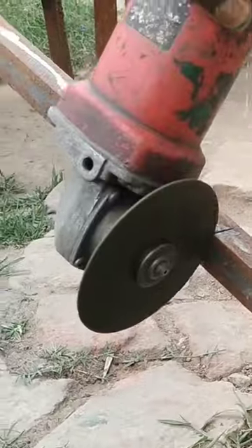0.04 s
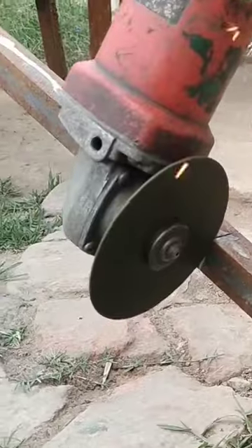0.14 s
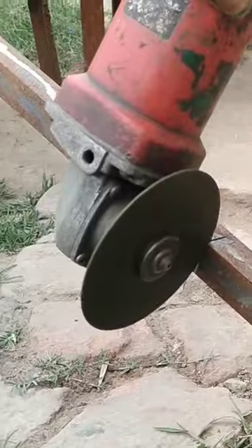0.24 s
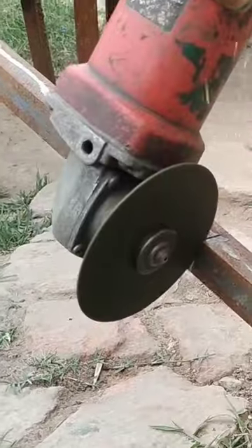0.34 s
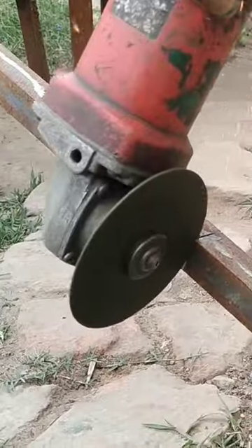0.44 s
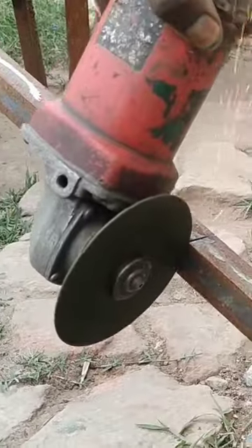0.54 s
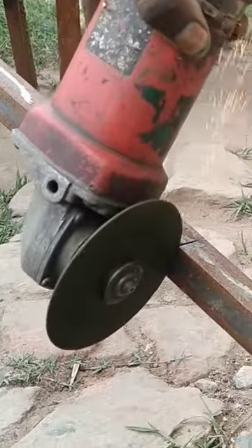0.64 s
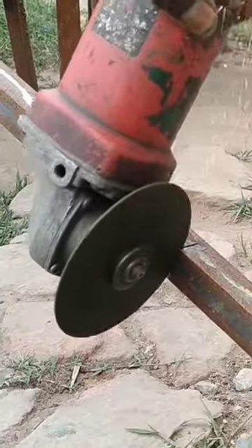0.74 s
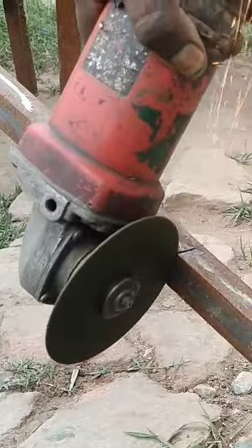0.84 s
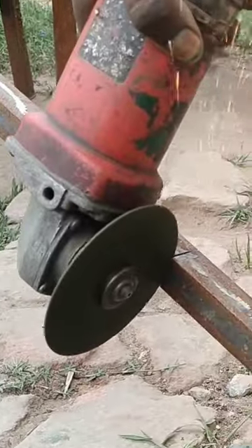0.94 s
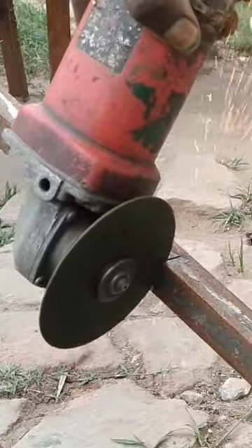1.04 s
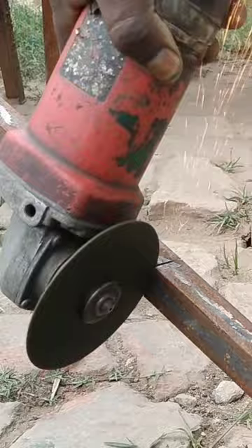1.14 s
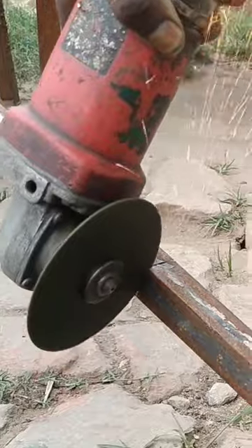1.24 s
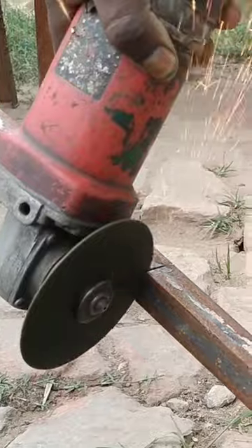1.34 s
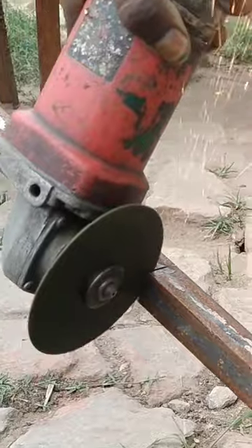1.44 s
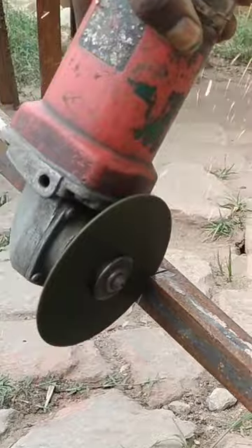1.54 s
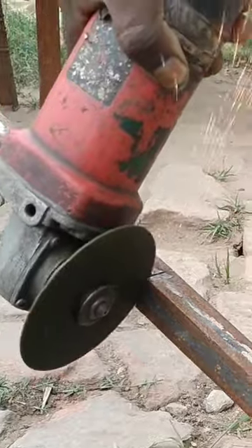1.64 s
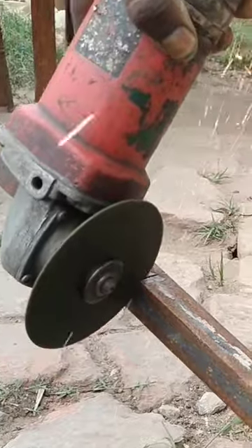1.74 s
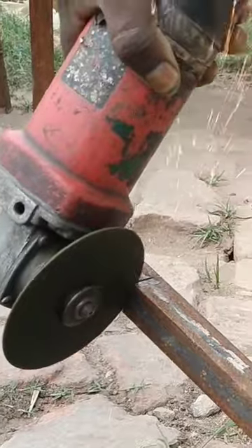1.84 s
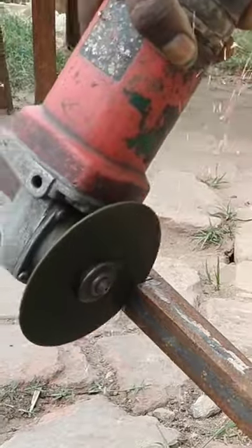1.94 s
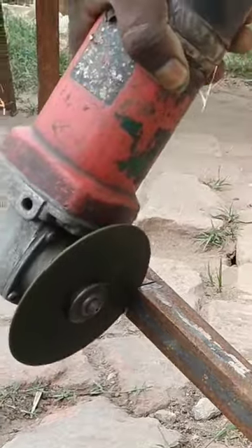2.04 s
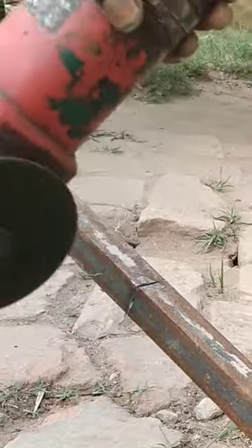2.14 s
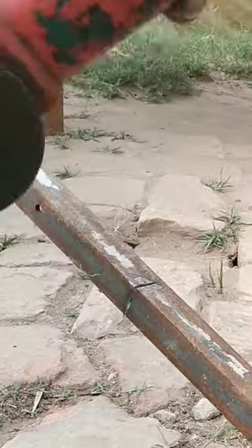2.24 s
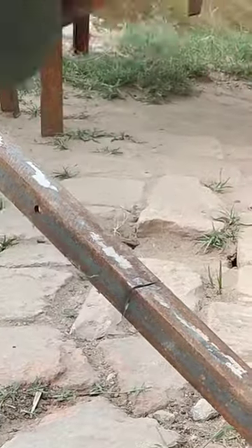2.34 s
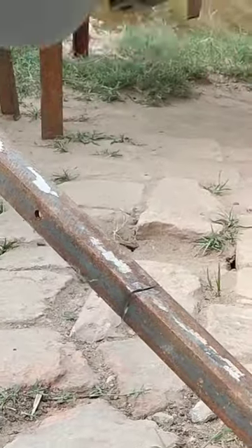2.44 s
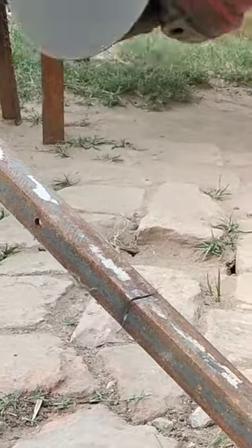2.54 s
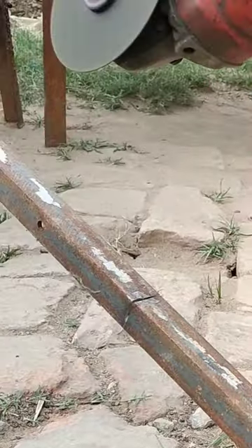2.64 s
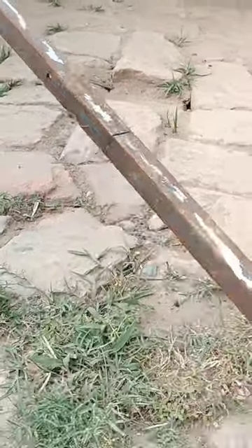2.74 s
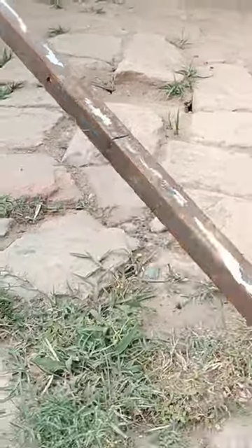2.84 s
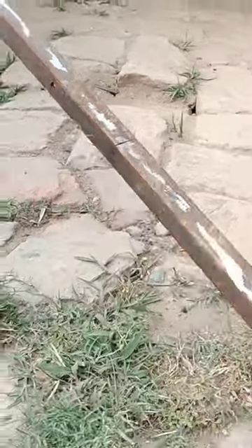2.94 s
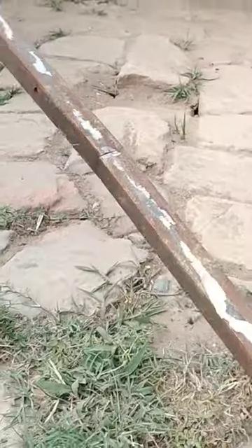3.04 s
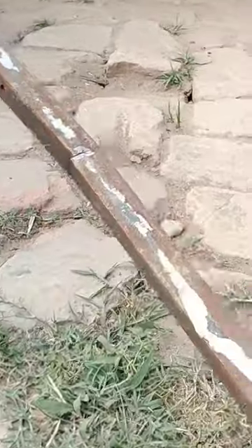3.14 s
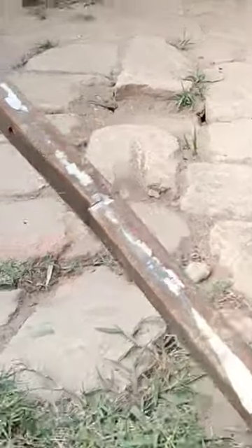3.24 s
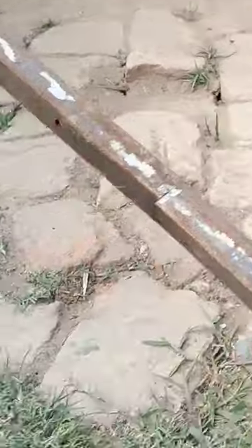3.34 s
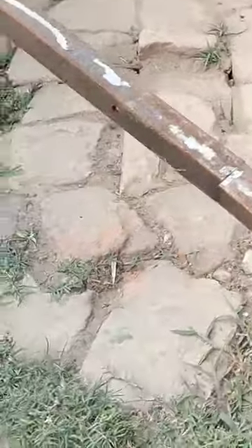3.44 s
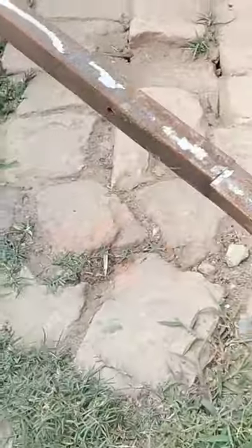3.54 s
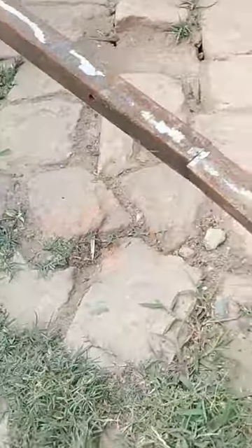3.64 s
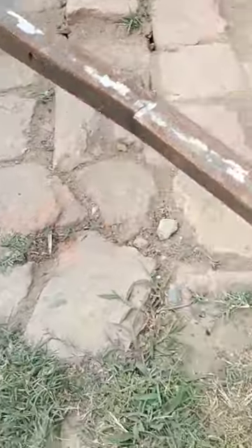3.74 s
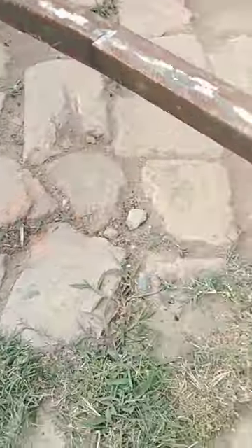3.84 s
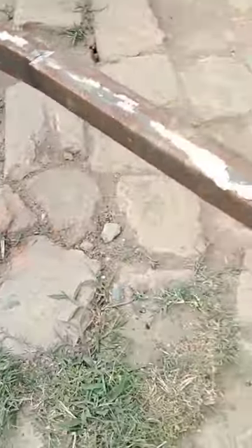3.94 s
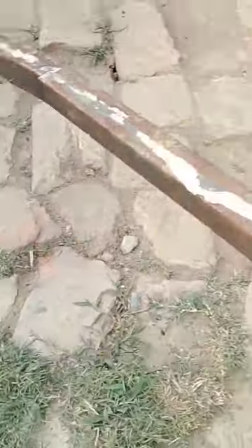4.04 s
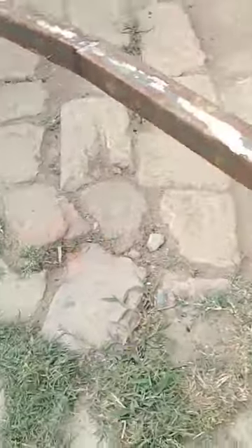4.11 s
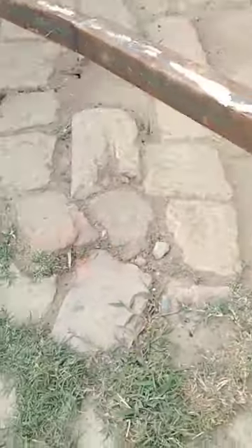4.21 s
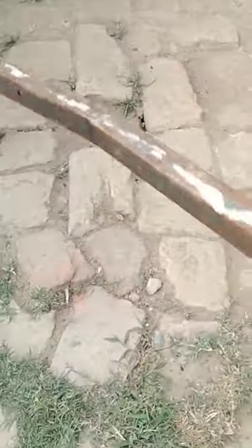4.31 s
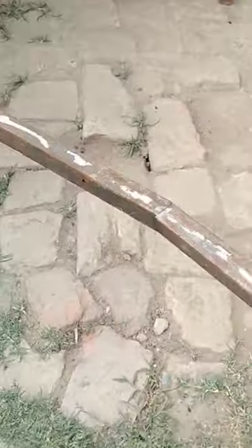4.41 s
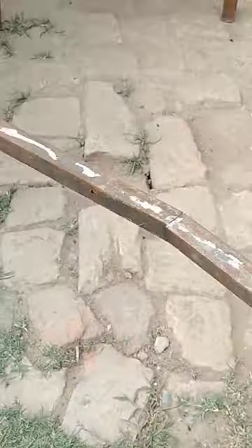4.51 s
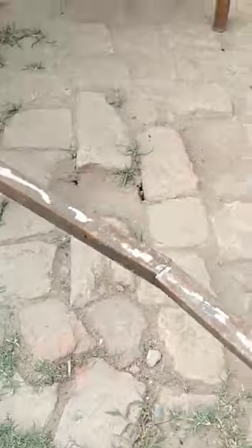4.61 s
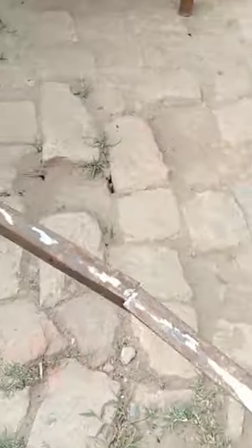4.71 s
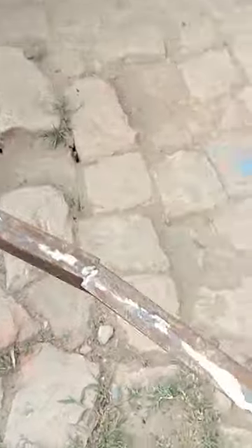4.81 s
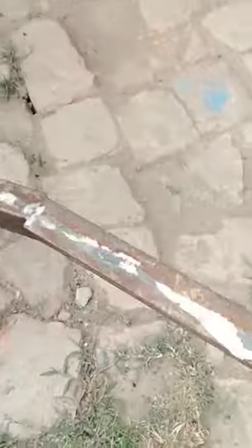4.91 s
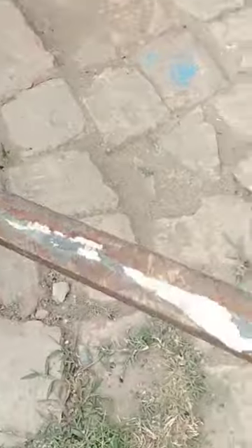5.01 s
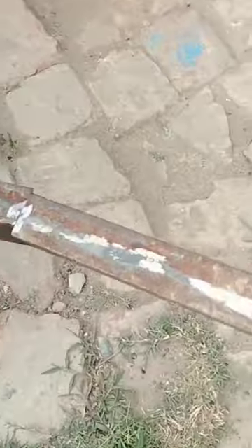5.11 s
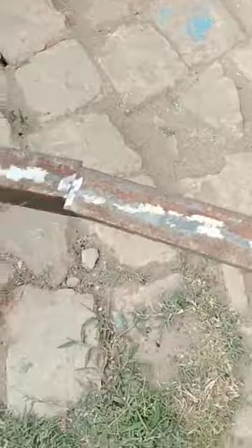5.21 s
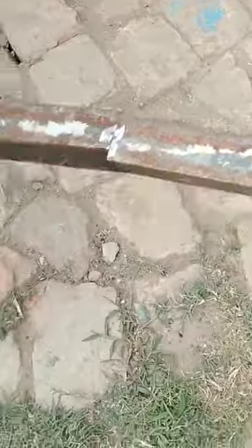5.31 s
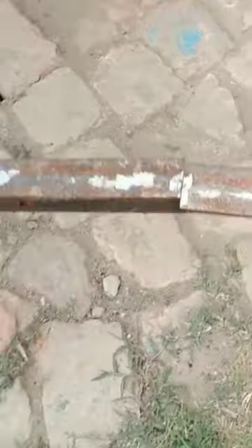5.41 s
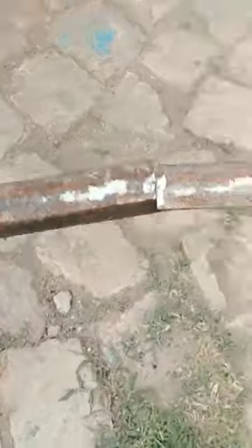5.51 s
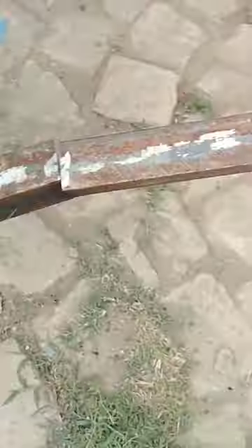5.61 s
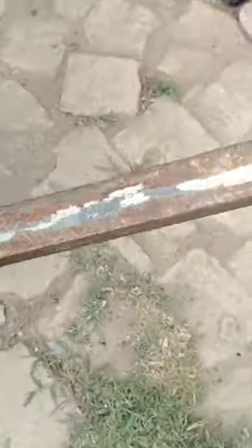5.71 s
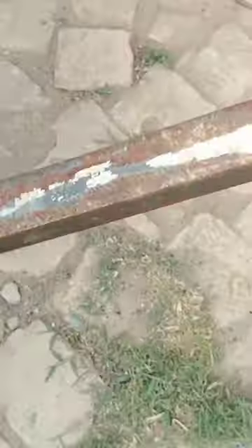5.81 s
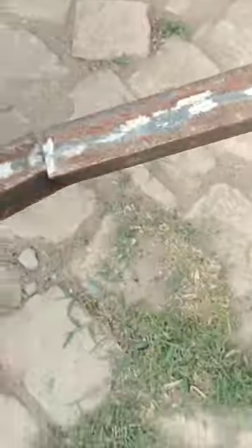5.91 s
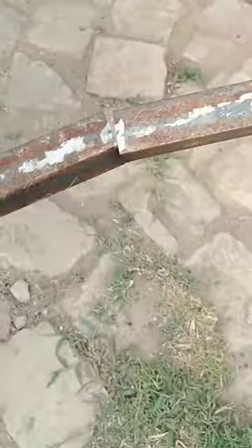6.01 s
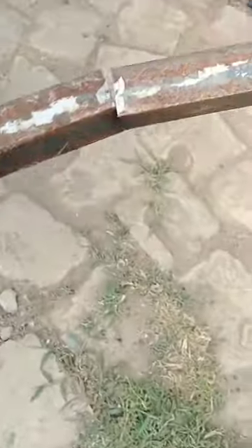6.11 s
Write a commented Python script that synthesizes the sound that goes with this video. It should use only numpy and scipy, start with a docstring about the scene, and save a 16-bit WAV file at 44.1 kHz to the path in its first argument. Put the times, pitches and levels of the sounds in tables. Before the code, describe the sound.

An angle grinder is already tearing through steel, gritty and whining, with puffs of air hitting the close stereo microphone. After about two seconds it runs free, rising in pitch, then cuts off. Quieter handling follows as the steel tube rasps, squeaks and clanks on the stone paving, with one sharp ringing knock near the end. The yard behind holds a soft rumble, a thin hush and, briefly, a faint hum and falling whine.

```python
"""A paved yard, a stereo microphone close to an angle grinder. The disc cuts a square steel tube, grit
tearing at the metal while the cooling air buffets both microphone ports. At 1.9 s it lifts clear and
speeds up, fan and gears hissing, then stops short near 2.8 s. From there the tube is turned by hand:
it scrapes, squeaks, rings thinly and knocks on stone, hardest just before the end.
Behind the handling lie a low rumble, a thin hush and, for a while, a hum and a faint falling whine."""
import sys
import numpy as np
from scipy import signal
from scipy.fft import rfft, irfft, next_fast_len
from scipy.io import wavfile
from scipy.ndimage import uniform_filter1d, map_coordinates

SR = 44100
rng = np.random.default_rng(int(sys.argv[2]) if len(sys.argv) > 2 else 0)


def digitize_waveform(pressure):
    """Quantize a signal to 16-bit integers and store it at the path in sys.argv[1].

    Rows of a 2-D input are taken as channels; values are limited to [-1, 1].
    """
    field = np.atleast_2d(pressure).T
    bounded = np.clip(field, -1, 1)
    quanta = np.round(bounded * 32767).astype(np.int16)
    wavfile.write(sys.argv[1], SR, quanta)


N = 271656
TIME = np.arange(N) / SR
PAN = np.array([[.5], [-.5]])  # splits a left-over-right difference between the channels

# armature under load: time_s, turns_per_s
LOADED_SPEED = [(0, 307), (.14, 307.5), (.25, 300.5), (.5, 309.5), (.8, 315.5), (.9, 311.5), (1.05, 315.5),
                (1.3, 316), (1.47, 314.5), (1.6, 313), (1.75, 317), (1.9, 315)]
# disc in the steel: time_s, grinding_db, armature_tones_db, slot_whine_db
CUT_LEVELS = [(0.0, -29.5, -43, -44.5), (.3, -29, -45, -50.5), (.43, -29, -44.5, -41),
              (0.469, -30.5, -55, -39.5), (.51, -29.5, -42.5, -45.5), (.58, -30, -44.5, -61.5),
              (.66, -28.5, -49, -41), (.78, -29, -47.5, -43.5), (.84, -29, -46.5, -65),
              (1.4, -29, -46.5, -63), (1.47, -29, -49, -44), (1.58, -29, -42.5, -55),
              (1.7, -30, -49.5, -40), (1.78, -29, -45.5, -54), (1.868, -29.5, -52.5, -55),
              (1.919, -37.5, -70, -43)]
# disc in the air: time_s, fan_and_gears_db, armature_tones_db
FREE_LEVELS = [(1.92, -62.5, -70), (1.932, -36, -58), (2.394, -32.5, -55.5), (2.732, -30.5, -56),
               (2.754, -35.5, -70), (2.806, -37.5, -63), (2.87, -68.5, -100)]
# armature tones: multiple_of_speed
ARMATURE_MULTIPLES = [.5, .86, 1, 1.8, 2, 2.74, 3, 4, 5, 6, 10, 13, 15, 16, 17, 36]
# strength of each of those tones: cutting_db, free_db
ARMATURE_GAINS = [(-20, -15), (5, -16), (6, -17), (-20, -7), (-1, -9), (-20, -6), (-2, -5), (-5, -2),
                  (-6, -6), (-9, -3), (-10, -11), (-9, -9), (-5, -12), (-8, -12), (-10, -12), (-12, -5)]
# spectra of the shallow cut, the deep cut and the fan with its gears: frequency_hz, density_db
SHALLOW_SPECTRUM = [(530, -33), (900, -7), (1060, -12.5), (1230, -11), (1800, -11.5), (2290, -15),
                    (3930, -10.5), (4280, -6), (4880, -10.5), (6660, -8.5), (7600, -14), (11300, -10.5),
                    (12300, -5), (14500, -14.5), (15800, -26)]
DEEP_SPECTRUM = [(530, -3), (900, -3.5), (967, -4.5), (1140, -4), (1240, -8.5), (1440, -17.5), (1540, -3.5),
                 (2350, -11.5), (3840, -6.5), (4280, -4), (7510, -9.5), (10500, -11), (13000, -3),
                 (14900, -8.5), (15800, -30)]
FAN_SPECTRUM = [(88, -39.5), (150, -12.5), (190, -17), (303, -18.5), (361, -19), (447, -20), (713, -7),
                (993, -7.5), (1370, -5), (1750, 0), (2800, -3), (4050, -3), (5000, -1), (6570, 5.5),
                (7800, 0.5), (9710, -3), (13800, -1), (15800, -9)]

# cooling air on the microphone: start_s, level_db, length_s
GUSTS = [(0.0, -29, 0.084), (0.159, -27, 0.077), (0.196, -26.5, 0.03), (0.244, -27, 0.037),
         (0.315, -30, 0.081), (0.418, -31, 0.013), (0.501, -30, 0.1), (0.627, -30, 0.17),
         (0.82, -24.5, 0.024), (0.859, -29, 0.025), (0.965, -34, 0.028), (1.075, -27, 0.072),
         (1.289, -25.5, 0.11), (1.518, -27, 0.11), (1.755, -26, 0.09), (1.91, -27, 0.0043)]
# spectrum of its puffs: frequency_hz, density_db
PUFF_SPECTRUM = [(12, -31.5), (20, -17), (49, 1.5), (156, -4), (267, -1.5), (330, -6), (410, -9.5),
                 (501, -9), (738, -12), (937, -12), (1350, -14.5), (3500, -21), (4550, -51.5), (7700, -120)]

# modes of the tube: pitch_hz, gain_db, t60_s
TUBE_MODES = [(290, -23, 0.18), (590, -22, .3), (883, -14, 0.25), (1066, -19, 0.41), (1450, -9, .18),
              (1690, -21, .9), (1890, -8, .16), (1975, -21, 1), (2300, -26, 0.8), (2600, -10, 0.18),
              (2990, -7, 0.16), (3400, -10, 0.2), (3800, -8, .25), (4110, -9, 0.18), (4310, -7, 0.16),
              (4730, -6, .15), (5020, -5, 0.2), (5440, -6, .16), (5650, -5, .22), (5910, -12, 0.3),
              (6030, -5, 0.14), (6460, -4, 0.13), (6850, -1, 0.15), (7445, -5, 0.14), (7705, -11, .26),
              (8180, -1, 0.17), (8845, -5, 0.2), (9900, -11, .12), (10510, -3, 0.11), (10830, -12, 0.15),
              (12100, -20, .12)]
# tube on stone: start_s, strength_db, rattle_t60_s, rattle_hz, width_octaves, ring_db, tilt_db_per_octave
KNOCKS = [(3.018, -33, .15, 4000, 1.2, -5, 2), (3.246, -39, 0.13, 3500, 1.5, -5.5, -3),
          (4.19, -19, 0.23, 4430, 0.98, -11.5, -1.5), (5.5825, -23.5, 0.11, 8540, 1, -14, 2),
          (5.852, -9.5, 0.17, 7400, 2.45, -12.5, 4.5), (5.98, -27, 0.13, 2760, 1.54, -11, -3.5)]
# grit ticks: start_s, strength_db, pitch_hz
TICKS = [(3.246, -40, 4970), (4.06, -41.5, 6540), (4.5372, -47.5, 11100), (5.4206, -38, 12900),
         (5.4227, -31, 12100), (5.496, -43, 9050)]
# short squeaks and thin ringing tones of the tube: start_s, top_db, length_s, climb_db, fall_db_per_s,
# pitch_hz, glide_hz_per_s, throb_share, jitter_share, left_over_right_db
SQUEAKS = [(3.689, -56, .085, 5, 350, 2272, 430, .3, .003, 2),
           (3.74, -46, .065, 8, 700, 2530, 100, .3, .003, 3),
           (3.73, -45, .06, 7, 400, 6288, 0, .2, .001, 0), (3.76, -46, .055, 7, 400, 4750, 0, .5, .012, 0),
           (3.866, -59, .07, .5, 350, 3998, 0, .1, .001, 0),
           (3.88, -74, .2, -3, 100, 2340, -150, .2, .002, 0),
           (3.99, -80, .07, 5, 600, 4100, 4300, .1, .002, 0),
           (4.065, -81, .08, -4, 400, 4410, -2400, .1, .002, 0),
           (4.37, -79, .17, 1, 150, 5740, 0, .2, .001, 0),
           (4.635, -59, .022, .5, 420, 2346, 50, .6, .006, 0),
           (4.885, -72, .02, 1, 600, 1400, -9000, .2, .01, 0),
           (4.915, -76, .02, 1, 500, 1790, 0, .2, .004, 0), (4.96, -64, .07, 8, 400, 2910, 0, .2, .003, -1),
           (5.036, -53, .03, 1, 120, 2902, -60, .3, .003, -2),
           (5.045, -63, .05, 1, 150, 5093, 0, .2, .002, 0),
           (5.075, -39.5, .095, 20, 330, 3735, -40, .8, .006, 2.5),
           (5.237, -37.5, .062, 1, 550, 1715, -50, .15, .005, -5),
           (5.18, -55, .22, 1, 400, 1750, 150, .5, .012, -3), (5.37, -66, .1, 1, 400, 1270, 0, .4, .012, 0),
           (5.53, -67, .13, 1, 400, 1290, -200, .4, .015, 0),
           (5.71, -65, .065, 0, 330, 2490, -1350, .3, .003, 0)]
# harmonics of each of those, relative to its level: first_db, second_db, ...
SQUEAK_HARMONICS = [(2, 9, 9, -6, -8, -6), (0,), (0,), (0,), (0,), (0,), (0,), (0,), (0,),
                    (-2.5, -1.5, -5, -14, -12, -19), (0,), (0,), (0,), (0, -15), (0,), (0, -17, -23),
                    (1.5, -6, -1, 2, -5, -10, -26, -12, -18), (0,), (0,), (0,), (0,)]
# scrapes as the tube turns: start_s, top_db, length_s, climb_db, relative_body_db, relative_treble_db
SCRAPES = [(2.881, -65.5, 0.1, 4, 5, 2.5), (2.941, -54, 0.15, 7, -5, -10),
           (3.007, -41.5, 0.027, 16, -14, 5), (3.202, -58.5, 0.013, 6, 1, -10),
           (3.251, -58, 0.014, -7, -7, -20), (3.69, -45.5, 0.058, 23, -38, 7),
           (3.769, -46, 0.083, -3, -18, -9), (4.018, -78, 0.0072, 10, 10, -24),
           (4.058, -67, 0.0041, 6, 9, -12), (4.63, -81, 0.015, .5, -21, -5),
           (4.84, -73.5, 0.02, 7, 4, 12.5), (5.031, -49.5, 0.17, 27, -18, -8),
           (5.244, -43, 0.043, 5, -23, 12), (5.317, -45.5, 0.036, 8, -18, -22),
           (5.594, -54, 0.053, 5, 2.5, 3), (6.093, -52, 0.03, 13, -4, 2)]
# steady rubbing under the scrapes: time_s, level_db
RUB_LEVELS = [(2.88, -92), (3.3, -65.5), (3.45, -80), (4.9, -82.5), (5.4, -64.5), (5.75, -66.5),
              (6.16, -67)]
# spectrum of rasping rust and grit: frequency_hz, density_db
RASP_SPECTRUM = [(150, -51), (250, -6), (520, -12.5), (1020, -10.5), (2300, -2.5), (2470, 2), (3550, 2.5),
                 (4770, 7.5), (5390, -0.5), (6090, -3), (13800, -15.5), (15800, -12)]
# handling thuds: start_s, level_db, length_s, relative_rumble_db
THUDS = [(3.012, -51.5, 0.046, -2), (3.117, -61, 0.013, 12), (3.165, -66.5, 0.018, 14),
         (3.211, -54.5, 0.02, 7), (3.796, -72, 0.013, 0), (4.189, -54, 0.045, -23),
         (4.253, -66.5, 0.073, -12), (4.426, -66.5, 0.011, 10), (5.152, -75, .02, -11),
         (5.24, -77, .06, -14), (5.35, -73, .03, -6), (5.396, -70.5, .015, 7), (5.482, -57.5, 0.042, -11),
         (5.857, -45, 0.0087, -9), (5.988, -66, 0.035, -21)]

# low rumble around the yard: time_s, level_db
RUMBLE_LEVELS = [(1.95, -67), (2.3, -68), (2.91, -71), (3.13, -56), (3.58, -70), (4.28, -63), (4.54, -68),
                 (5.09, -69), (5.58, -63.5), (6.16, -62)]
# spectra of the thuds, the rumble and the hush: frequency_hz, density_db
THUD_SPECTRUM = [(82, -23.5), (140, -13), (248, 6.5), (392, -9.5), (510, -9), (700, -12.5), (910, -3.5),
                 (1540, -120)]
RUMBLE_SPECTRUM = [(12, -31), (20, -23.5), (48, 0), (81, 2), (109, 1.5), (140, -8), (180, -2), (230, -21),
                   (400, -120)]
HUSH_SPECTRUM = [(180, -29.5), (300, -3), (420, 1.5), (800, -1), (1680, 1), (2800, -5), (3920, -13),
                 (5000, -11), (6780, -2), (8140, -33), (13600, -16), (15800, -43)]
# wavering hum: time_s, pitch_hz, level_db
HUM_CURVE = [(2.86, 122.7, -73), (3.144, 108.8, -62), (3.35, 114.2, -79), (3.634, 115, -59),
             (3.674, 118.5, -87), (3.85, 116.9, -59), (4.1, 114.9, -64), (4.482, 115.5, -64),
             (4.55, 115.7, -88)]
# falling whine and its harmonics: time_s, pitch_hz, first_db, second_db, third_db, fourth_db
WHINE_CURVE = [(3.3, 1352, -84, -98, -98, -85), (3.37, 1340, -80, -95, -98, -76),
               (3.44, 1305, -80, -92, -95, -76), (3.5, 1240, -79, -84, -92, -76),
               (3.54, 1215, -77, -69, -80, -74), (3.6, 1203, -78, -72, -81, -75),
               (3.68, 1190, -79, -74, -88, -75), (3.86, 1120, -79, -86, -95, -90),
               (4.18, 1065, -80, -88, -98, -98)]
# reverberation off the yard walls: frequency_hz, t60_s
WALL_DECAY = [(200, 0.44), (2000, 0.11), (10000, 0.064)]

# likeness of the two channels for cutting, free running and other noise: frequency_hz, correlation
CUT_LIKENESS = [(60, .12), (300, 0.42), (700, 0.29), (1500, 0.141), (4000, 0.09), (8000, 0.29),
                (13000, 0.15)]
FREE_LIKENESS = [(60, .5), (300, 1), (700, 1), (1500, 0.15), (4000, 0.066), (13000, 0.19)]
YARD_LIKENESS = [(60, 0.52), (180, 0.78), (550, 0.92), (1650, 0.05), (4970, -0.086), (15000, 0.29)]
# colour of the microphone ports: frequency_hz, left_over_right_db
PORT_BALANCE = [(60, 0), (180, -0.5), (550, 1), (1650, 1.5), (4970, -3.5), (15000, -4.5)]
# phase from the spacing of the ports: frequency_hz, left_lead_rad
PORT_LEAD = [(100, -0.15), (1000, 0.47), (1720, 0.6), (4300, -0.1), (5000, -2), (8000, -2.5), (10600, -2),
             (13300, -5)]


def grinder():
    """Close by: the armature labours in the cut, then closes in on its idle speed once lifted clear."""
    lift_s, lift_hz, idle_hz, spin_up_s = 1.93, 352, 401, .27
    spin_up = idle_hz - (idle_hz - lift_hz) * np.exp(-(TIME - lift_s) / spin_up_s)
    speed_hz = np.where(TIME < lift_s, curves(LOADED_SPEED)[0], spin_up)
    angle = 2 * np.pi * np.cumsum(speed_hz) / SR
    beat = (1 + .2 * np.cos(angle)) * amp(1.2 * wobble(400))
    return cutting(speed_hz, angle, beat) + free_running(speed_hz, beat)


def cutting(speed_hz, angle, beat):
    """Grit tears the steel once a turn of the armature; the tube rings and the slot whines."""
    grinding_db, tones_db, slot_db = curves(CUT_LEVELS)
    # one sharp jolt a turn draws a comb of lines through the grit noise
    jolts = np.exp(4000 * (np.cos(angle + np.array([[0], [2]])) - 1))
    grit = beat * rng.standard_normal((2, N))
    grit += .4 * unit(filtered(jolts * amp(4 * wobble(150)), lambda f: (f / 12000) ** 2 * (f < 15900)))
    # the sizzle climbs as the slot closes round the disc
    depth = np.clip((TIME - .6) / .6, 0, 1)
    shallow = rush(SHALLOW_SPECTRUM, 1.4, CUT_LIKENESS, source=grit)
    deep = rush(DEEP_SPECTRUM, 1.4, CUT_LIKENESS, source=grit)
    ring = amp(-11) * unit(tube_ringing(grit))
    cut = amp(grinding_db) * ((1 - depth) * shallow + depth * deep + ring)
    gains_db = np.transpose(ARMATURE_GAINS)[0]
    cut += amp(tones_db) * tones(speed_hz, ARMATURE_MULTIPLES, gains_db, shaky_db=2.5, rate=30, drift=1)
    cut += amp(slot_db) * tones(speed_hz, [14], [0], shaky_db=2.5, rate=32, drift=.75)
    return during(0, CUT_LEVELS[-1][0], .072) * cut * amp(-.9 * PAN)


def free_running(speed_hz, beat):
    """With the disc in the air, fan and gears hiss over the armature's tones."""
    fan_db, tones_db = curves(FREE_LEVELS)
    air = beat * rng.standard_normal((2, N))
    hiss = amp(fan_db) * rush(FAN_SPECTRUM, 2.14, FREE_LIKENESS, source=air)
    gains_db = np.transpose(ARMATURE_GAINS)[1]
    whirr = amp(tones_db) * tones(speed_hz, ARMATURE_MULTIPLES, gains_db, shaky_db=3.5, rate=22, drift=.8)
    return during(FREE_LEVELS[0][0], FREE_LEVELS[-1][0]) * (hiss + whirr) * amp(.5 * PAN)


def buffeting():
    """Right at the microphone, eddies push each port inward in one-sided puffs; hard gusts are sharper."""
    gusts = [swell(*gust, climb_db=-2, fall_db_per_s=240) for gust in GUSTS]
    lull = amp(-35.5) * during(0, 1.4)
    level = np.max(gusts + [lull], axis=0)
    eddies = rng.random((2, N)) < 600 / SR
    pushes = eddies * amp(2.94 * rng.exponential(size=(2, N)).clip(0, 2.4))
    pushes += .22 * pushes[::-1]
    pushes[1] = np.roll(pushes[1], 5)  # the stream reaches the left port first
    air = unit(pushes) + .74 * rng.standard_normal((2, N))
    puffs = unit(filtered(air, lambda f: amp(along(PUFF_SPECTRUM, f))))
    edges = filtered(puffs, lambda f: f ** 2 / (f ** 2 + 700 ** 2))
    sharpness = np.sqrt(level / amp(-20.5)) - 1
    flutter = amp(1 + .53 * np.array([wobble(39.35), wobble(39.73)]))
    blowing = during(0, GUSTS[-1][0] + GUSTS[-1][2], .006)
    return blowing * level * flutter * (puffs + sharpness * edges) * amp(-1.8 * PAN)


def knocks():
    """Each blow on stone rings the tube at new strengths under a dying rattle; grit adds bare ticks."""
    n = SR // 2
    out, t, hz = np.zeros((2, N + n)), np.arange(n) / SR, np.fft.rfftfreq(n, 1 / SR)
    attack = 1 - np.exp(-t / .00037)
    for start_s, db, rattle_t60, rattle_hz, octaves, ring_db, tilt_db in KNOCKS:
        ring = np.zeros((2, n))
        for chance_db, (pitch_hz, gain_db, t60) in zip(rng.normal(0, 2.5, len(TUBE_MODES)), TUBE_MODES):
            # the loose cut end rattles, so no mode keeps its phase
            shake = np.cumsum(rng.normal(0, .02, (2, n)), axis=1) + rng.uniform(0, 2 * np.pi)
            mode_db = gain_db + chance_db + tilt_db * np.log2(pitch_hz / 4000)
            ring += amp(mode_db - 60 * t / t60) * np.sin(2 * np.pi * pitch_hz * t + shake)
        colour = amp(-6 * (np.log2((hz + 200) / rattle_hz) / octaves) ** 2)
        rattle = unit(irfft(rfft(rng.standard_normal((2, n))) * colour))
        rattle *= amp(-60 * t / rattle_t60) + .09 * amp(-60 * t / .037)
        at = round(start_s * SR)
        out[:, at:at + n] += amp(db - 13) * (rattle + amp(ring_db) * ring) * attack
    for start_s, db, pitch_hz in TICKS:
        at = round(start_s * SR)
        out[:, at:at + n] += amp(db + 4.5 - 60 * t / .002) * np.sin(2 * np.pi * pitch_hz * t)
    return out[:, :N]


def squeaks():
    """Short squeaks and thin ringing tones of the tube, rough and throbbing, a few rich in overtones."""
    out = np.zeros((2, N))
    # the tube shudders as it bends, so the tones throb
    shudder = np.cos(2 * np.pi * np.cumsum(85 + 15 * wobble(40)) / SR)
    for (*envelope, pitch_hz, glide, throb, jitter, pan_db), gains_db in zip(SQUEAKS, SQUEAK_HARMONICS):
        hz = (pitch_hz + glide * (TIME - envelope[0])) * (1 + jitter * wobble(300))
        tone = tones(hz, np.arange(len(gains_db)) + 1, gains_db, shaky_db=1.5, rate=120, drift=.6)
        out += swell(*envelope) * (1 + throb * shudder) * tone * amp(pan_db * PAN)
    return out


def scraping():
    """Rust and grit rasp along the tube and keep its modes humming; body and treble follow the grip."""
    rub = during(RUB_LEVELS[0][0], N / SR) * amp(curves(RUB_LEVELS)[0])
    strokes = np.array([swell(*scrape[:4], fall_db_per_s=390) for scrape in SCRAPES])
    level = rub + strokes.sum(axis=0)
    body_db, treble_db = np.transpose(SCRAPES)[4:]
    body = rub + amp(body_db) @ strokes
    treble = rub * amp(-1.5) + amp(treble_db) @ strokes
    under = lambda f, edge_hz: -10 * np.log10(1 + (f / edge_hz) ** 6)
    over = lambda f, edge_hz: -10 * np.log10(1 + (edge_hz / (f + 1)) ** 6)
    grains = lambda: rng.standard_normal((2, N)) * amp(.74 * wobble(150))
    low = body * rush(RASP_SPECTRUM, 3, source=grains(), band_db=lambda f: under(f, 1500))
    mid = level * rush(RASP_SPECTRUM, 4, source=grains(), band_db=lambda f: over(f, 1500) + under(f, 8000))
    high = treble * rush(RASP_SPECTRUM, 1.4, source=grains(), band_db=lambda f: over(f, 8000))
    return low + mid + high + amp(31) * tube_ringing(level * grains())


def tube_ringing(force):
    """The tube's modes ring; 45 random narrow resonances add thin ringing streaks from 1.2 to 12 kHz."""
    grip = .7  # a hand on the tube shortens each decay to this share
    streaks = [(1200 * 10 ** place, -7 - 8 * weakness, .2) for place, weakness in rng.random((45, 2))]

    def resonance(f, pitch_hz, gain_db, t60):
        width_hz = np.log(1000) / (np.pi * t60 * grip)
        return amp(gain_db) * np.sqrt(width_hz) * 1j * f / (pitch_hz ** 2 - f ** 2 + 1j * f * width_hz)

    return filtered(force, lambda f: sum(resonance(f, *row) for row in TUBE_MODES + streaks))


def thuds_and_rumble():
    """Handling the tube makes dull thuds, each briefly swelling the yard's low rumble."""
    bumps = np.array([swell(*thud[:3], climb_db=0, fall_db_per_s=500) for thud in THUDS])
    rumble_level = amp(curves(RUMBLE_LEVELS)[0] + 2.5 * wobble(30)) + amp(np.transpose(THUDS)[3]) @ bumps
    rumble = rumble_level * rush(RUMBLE_SPECTRUM, 1.2)
    thud_level = (amp(-78.5) + bumps.sum(axis=0)) * amp(1.3 * wobble(40))
    thuds = thud_level * rush(THUD_SPECTRUM, 2)
    return during(RUMBLE_LEVELS[0][0], N / SR) * (rumble + thuds)


def yard_background():
    """Well behind the work: a wavering hum, a faint whine sliding down and a thin hush."""
    hum_hz, hum_db = curves(HUM_CURVE)
    hum = amp(hum_db) * tones(hum_hz, [1], [0], shaky_db=3, rate=22, drift=.7)
    hum *= during(HUM_CURVE[0][0], HUM_CURVE[-1][0], .038)
    whine_hz, *whine_db = curves(WHINE_CURVE)
    whine = tones(whine_hz, [1, 2, 3, 4], whine_db, shaky_db=3.5, rate=35, drift=.9)
    whine *= during(WHINE_CURVE[0][0], WHINE_CURVE[-1][0], .05)
    return hum + whine + amp(-69.5) * rush(HUSH_SPECTRUM, 5.6)


def walls(x):
    """The yard walls answer with a short tail whose treble dies first."""
    hz, t, noise = signal.stft(rng.standard_normal((2, SR // 2)), SR, nperseg=256)
    tail = signal.istft(noise * amp(-60 * t / along(WALL_DECAY, hz)[:, None]), SR, nperseg=256)[1]
    return signal.fftconvolve(x, tail / np.linalg.norm(tail[0]), axes=1)[:, :N]


def rush(spectrum, patchy_db, likeness=YARD_LIKENESS, source=None, band_db=lambda f: 0):
    """Coloured stereo noise of rms 1, with patches of random gain in time and frequency."""
    pair = rng.standard_normal((2, N)) if source is None else source
    frames = signal.stft(pair, nperseg=512)[2]
    patches = uniform_filter1d(rng.standard_normal(frames.shape[1:]), size=6, axis=0)
    patches = uniform_filter1d(patches, size=10, axis=1)
    pair = signal.istft(frames * amp(patchy_db * unit(patches)), nperseg=512)[1][:, :N]

    def response(hz):
        width_rad = np.arccos(along(likeness, hz)) / 2
        return amp(along(spectrum, hz) + band_db(hz)) * [np.cos(width_rad), np.sin(width_rad)]

    mid, side = filtered(pair, response)
    return unit(np.array([mid + side, mid - side]))


def tones(hz, multiples, levels_db, shaky_db, rate, drift):
    """Unsteady multiples of a pitch curve; the phase at each port wanders by about drift radians."""
    phase = 2 * np.pi * np.cumsum(hz) / SR
    out = np.zeros((2, N))
    for multiple, db in zip(multiples, levels_db):
        lead = rng.uniform(0, 2 * np.pi) + drift * np.array([wobble(rate), wobble(rate)])
        out += np.sqrt(2) * amp(db + shaky_db * wobble(rate)) * np.sin(multiple * phase + lead)
    return out


def swell(start_s, level_db, length_s, climb_db, fall_db_per_s):
    """Gain that sets in quickly, moves by climb_db to level_db over its length, then falls steadily."""
    age = TIME - start_s
    onset_db = 20 * age.clip(max=0) / .008  # 20 dB in 8 ms
    to_climb_db = climb_db * (1 - age / length_s).clip(0, 1)
    fallen_db = fall_db_per_s * (age - length_s).clip(0)
    return amp(level_db + onset_db - to_climb_db - fallen_db)


def during(start_s, end_s, ramp_s=.0046):
    """1 from start to end, ramping to 0 outside."""
    return np.clip(np.minimum(TIME - start_s, end_s - TIME) / ramp_s + 1, 0, 1)


def wobble(rate):
    """A smooth random curve, rate knots a second."""
    knots, coarse = rng.standard_normal(int(N * rate / SR) + 4), TIME[::8]
    return np.interp(TIME, coarse, map_coordinates(knots, [coarse * rate]))


def filtered(x, response):
    """x through a response given as a function of frequency."""
    size = next_fast_len(N + SR // 2)
    return irfft(rfft(x, size) * response(np.fft.rfftfreq(size, 1 / SR)), size)[..., :N]


def curves(rows):
    """One value per sample for each column after the time."""
    time_s, *columns = np.transpose(rows)
    return [np.interp(TIME, time_s, column) for column in columns]


def along(points, hz):
    """Reads (frequency_hz, value) points on a log axis."""
    point_hz, values = np.transpose(points)
    return np.interp(np.log(hz + 1), np.log(point_hz + 1), values)


def amp(db):
    return 10 ** (np.asarray(db) / 20)


def unit(x):
    return x / np.sqrt(np.mean(x ** 2) + 1e-20)


def scene():
    """Grinder and handled tube in front, the yard behind; knocks and squeaks come back off the walls."""
    steel = knocks() + squeaks()
    handling = (scraping() + steel + amp(-.5) * walls(steel)) * amp(-.9 * PAN)
    return grinder() + buffeting() + handling + thuds_and_rumble() + yard_background()


def record(dry):
    """The microphone: its ports differ in colour and arrival, hard peaks round off, the top is cut."""
    ceiling, fade_hz, limit_hz = .5, 15230, 15900
    port_response = lambda hz: amp(along(PORT_BALANCE, hz) * PAN) * np.exp(1j * along(PORT_LEAD, hz) * PAN)
    ports = filtered(dry, port_response)
    rounded = ports / (1 + np.abs(ports / ceiling) ** 4) ** (1 / 4)
    return filtered(rounded, lambda hz: (hz < limit_hz) / (1 + (hz / fade_hz) ** 60))


dry = scene()
out = record(dry)
digitize_waveform(out)
```